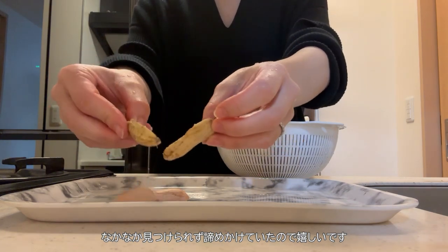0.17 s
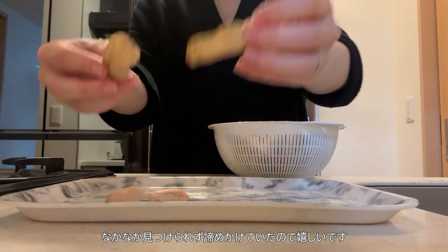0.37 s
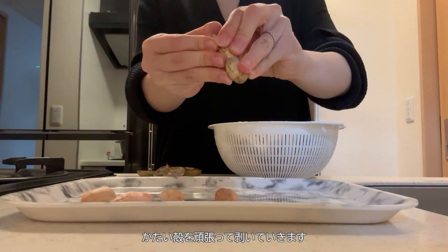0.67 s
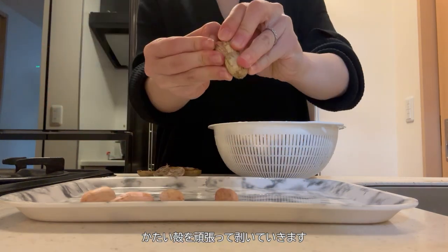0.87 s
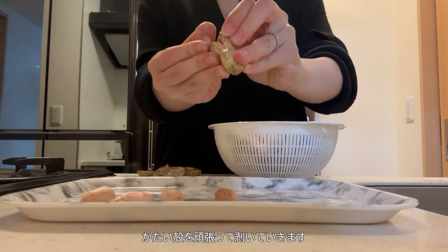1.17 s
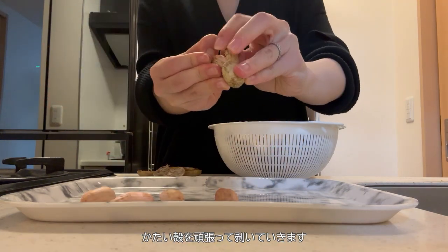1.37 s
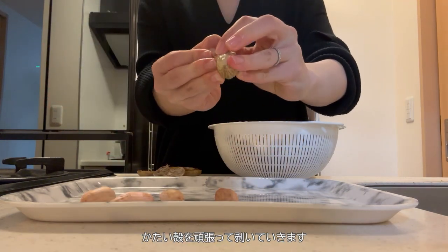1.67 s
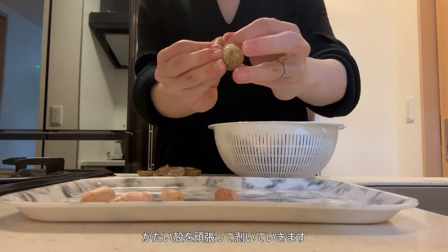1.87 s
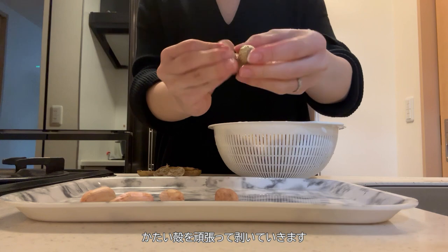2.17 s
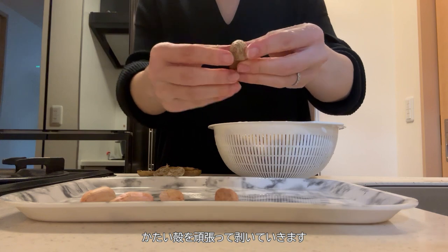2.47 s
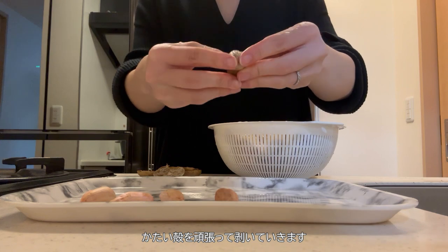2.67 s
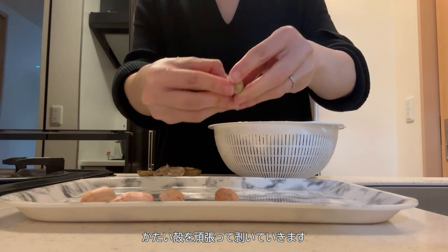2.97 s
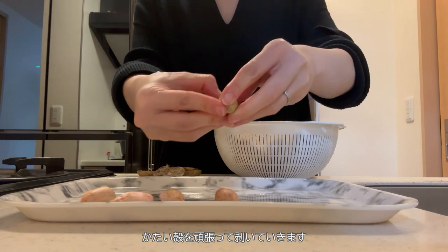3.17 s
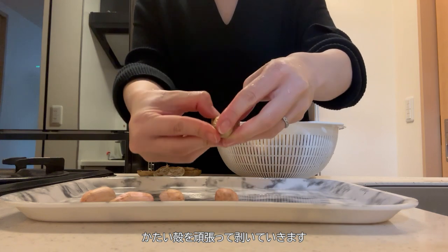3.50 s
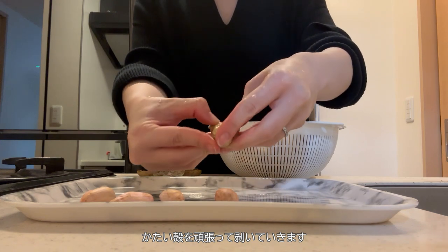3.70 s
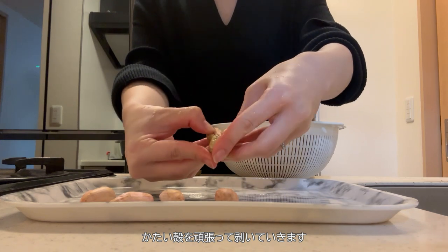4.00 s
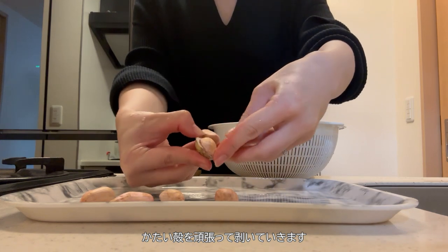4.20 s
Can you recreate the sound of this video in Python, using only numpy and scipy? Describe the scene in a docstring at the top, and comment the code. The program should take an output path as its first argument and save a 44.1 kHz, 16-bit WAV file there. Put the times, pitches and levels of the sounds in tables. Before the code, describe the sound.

Peanut kernels clatter onto a plastic tray, then hard shells crack and crinkle between fingers over a low kitchen appliance hum.

```python
"""Peanut kernels drop and bounce on a plastic tray, each impact exciting its damped bending modes.
Then shells snap and tick as they are broken by hand: fracture and crinkling strike the resonances
of the shell, and fingers rub the husk with a faint stick-slip hiss. The hard walls of a small
kitchen add reverberation, and appliances hum throughout."""
import sys
import numpy as np
from scipy import signal
from scipy.io import wavfile

SR = 44100
rng = np.random.default_rng(int(sys.argv[2]) if len(sys.argv) > 2 else 0)


def transcribe(signal):
    """Save signal, clipped to [-1, 1], as a 16-bit WAV file at the path in sys.argv[1]."""
    frames = np.atleast_2d(signal).T
    limited = np.clip(frames, -1, 1)
    pcm = np.round(limited * 32767).astype(np.int16)
    wavfile.write(sys.argv[1], SR, pcm)


N = 191482


def kernels_on_tray():
    """Impact excitation: each landing gives a contact tick, a broad knock and damped plate modes."""
    # landings: t/s, relative level/dB, hardness/(dB/octave), tick/dB, thump/dB, left minus right/dB
    drops = [(0.018, -19.5, 4, -9.5, -1.5, 4), (0.0327, -16, 4, -3.5, -1, 0),
             (0.1381, -18, 2, -6.5, -3, 1.5), (0.175, -21, -1.5, -30, -3.8, 3.5),
             (0.334, -43, -5.5, -22.5, 7, 1), (0.3907, -25.5, -8.5, -29, -12, 3),
             (.439, -32.5, -11.5, -28, -3.5, -2.1)]
    # tray modes: f/Hz, relative level/dB, T60/s
    tray_modes = [(165, -4.5, 0.19), (198.9, 1.9, 0.13), (283.5, -0.5, 0.12), (472, 0.5, 0.04),
                  (563.6, 0.5, 0.077), (810, -12.5, 0.15), (914.6, -4.5, 0.037), (1100, -9, 0.085),
                  (1143, -6, 0.069), (1248, -11, 0.11), (1860, -20, 0.16)]
    # knock spectrum of the thin tray: f/Hz, relative level/dB
    knock_spectrum = [(60, -36), (120, -22), (200, 11), (550, 9), (1200, 2.2), (2000, -10), (3000, -19.5),
                      (5000, -34.5), (9000, -114), (16000, -85.5)]
    out, length = np.zeros((2, N)), SR // 3
    t = np.arange(length) / SR
    hz, mode_db, t60 = np.transpose(tray_modes)[..., None]
    phase = rng.uniform(-0.8, 1, hz.shape) * np.clip(hz / 700, 0, 1.4)  # high modes arrive out of step
    for start_s, db, hardness, tick_db, thump_db, pan_db in drops:
        def blow_db(f):
            """Force spectrum: hard blows favour the treble; heavy ones move the whole tray."""
            return hardness * np.log2(np.maximum(f, 500) / 500) + thump_db * (f < 350)
        swing = from_db(mode_db - 5.5 + blow_db(hz) + rng.normal(0, 3.2, hz.shape) - 60 * t / t60)
        swing *= 1 - np.exp(-t * hz / 0.6)  # low modes take longer to swing up
        modes = np.array([np.sum(swing * np.sin(2 * np.pi * hz * t + side * phase), axis=0)
                          for side in (1, -1)])
        knock = decaying_noise(lambda f: 0.18 * (f / 1000) ** -.3,
                               lambda f: at_hz(knock_spectrum, f) + blow_db(f),
                               rise_s=0.00038, count=length)
        contact = rng.standard_normal(length) + .5 * rng.standard_normal((2, length))
        contact *= t / .0008 * np.exp(-t / .0008)
        tick = 17.5 * resonance(resonance(contact, 1960, 1080), 1640, 970)
        tick += 0.043 * resonance(resonance(contact, 3000, 3000), 3000, 3000)
        impact = modes + from_db(21) * knock + from_db(tick_db) * tick
        at = round(start_s * SR)
        out[:, at:at + length] += from_db(db) * pan(pan_db)[:, None] * impact
    # a small tray radiates little bass
    return signal.sosfilt(signal.butter(2, 80, "high", fs=SR, output="sos"), out)


def shell_cracks():
    """Brittle fracture strikes the shell's resonances, deep breaks the low ones: left, right, walls."""
    # fractures: t/s, relative level/dB, depth/dB, length/ms, left minus right/dB, share to walls/dB
    snaps = [(0.7932, -18.5, 10, 1.22, 4.5, -5.5), (1.0456, -32, -15, 1.84, 0.5, -3.5),
             (1.516, -62, -18.5, 1.7, -1.5, -3), (3.3355, -43.5, 4.5, 1.5, 3, -2),
             (3.6386, -37, -1.5, 1.46, -1.5, -1.5), (3.745, -47, -4.5, 1.8, 1.5, -1.5),
             (3.9879, -52.5, -8.5, 1.55, 2.5, 1.5), (4.0589, -21, 17, 2.5, 5, -1.5)]
    # husk crinkling in the grip: t/s, relative level/dB, depth/dB, length/ms
    crinkles = [(.5756, -67, -4, 21), (0.6203, -61, -17, 9.7), (0.665, -74.5, -10.5, 14),
                (.7282, -64.5, -10.5, 6.8), (0.7512, -52, -8, 11), (0.9792, -56, -9, 11.8),
                (1.1502, -82, 7.5, 13.4), (1.566, -77.5, -10, 10.8), (1.665, -88.5, 12.5, 11.6),
                (1.752, -81, -0.5, 22), (1.868, -85.5, 7, 18), (2.1518, -91, 14.5, 23),
                (2.256, -74.5, -5, 14), (2.292, -96, 18.5, 19), (2.915, -85, -1.5, 18),
                (3.074, -87.5, 5.5, 5.6), (3.1368, -84.5, 3.5, 5), (3.3, -69.5, -1.5, 17.3)]
    # resonances of body, hollow, wall, edge and splinter, a list for each part:
    # f/Hz, bandwidth/Hz, relative level/dB, left minus right/dB, left lag/ms
    shell_modes = [
        [(520, 270, 2.5, -5.5, 0.109), (1010, 180, 8.5, -8, 0.25)],
        [(1490, 520, 6.5, 7, 0.2), (2690, 500, 2.5, -4, 0.033)],
        [(3780, 570, -2, -2, 0.18), (4480, 360, 2, 9.5, 0.12), (5140, 920, -2.5, 1, 0.1)],
        [(7030, 970, -1.5, 2, 0.052), (9100, 1400, -8, -5, 0.04)],
        [(10874, 1000, -12, 3.5, 0.0066), (12300, 1200, -10, -4, 0.0012), (15100, 760, -10.5, -5.5, 0.00082)],
    ]
    # drive of each part: snap level/dB, crinkle level/dB, share of snap depth, share of crinkle depth
    part_drive = [(-34, -24.5, 1.74, .9), (-12, -8, 0.46, 1.2), (-3, -5.5, 0.36, .8), (-6, -5.5, .15, 0.52),
                  (1, -1, 0, 0.4)]
    snap_s, snap_db, snap_depth, snap_ms, snap_pan, walls_db = np.transpose(snaps)[..., None]
    crinkle_s, crinkle_db, crinkle_depth, crinkle_ms = np.transpose(crinkles)[..., None]
    out, polarity = 0, 1
    for modes, (in_snap_db, in_crinkle_db, snap_share, crinkle_share) in zip(shell_modes, part_drive):
        snap_drive_db = snap_db + in_snap_db + snap_share * snap_depth
        crinkle_drive_db = crinkle_db + in_crinkle_db + crinkle_share * crinkle_depth
        for hz, width, mode_db, left_db, lag_ms in modes:
            snap = fracture_impulses(snap_s, snap_drive_db, snap_ms, snap_pan + left_db, lag_ms,
                                     walls_db, slip_db=-10.5, slips=12)
            crinkle = fracture_impulses(crinkle_s, crinkle_drive_db, crinkle_ms, 5.5 + left_db, lag_ms,
                                        walls_db=0, slip_db=3, slips=40)
            out = out + polarity * from_db(mode_db + 29) * resonance(snap + crinkle, hz, width)
            polarity = -polarity
    return out


def fracture_impulses(start_s, db, length_ms, pan_db, lag_ms, walls_db, slip_db, slips):
    """Stress is released in steps, a first break and then fading slips: left, right, walls."""
    when, size = rng.random((2, len(start_s), slips + 1))
    offset_ms = np.c_[.8 * when[:, :1], length_ms * when[:, 1:]]
    slip_sizes = from_db(slip_db) * (2 * size[:, 1:] - 1) * (1.2 - when[:, 1:])
    sizes = np.c_[np.ones(start_s.shape), slip_sizes] * from_db(db)
    drawn_out = length_ms > 4  # from a shorter snap the walls return one blow
    walls = from_db(walls_db) * (drawn_out | (np.arange(slips + 1) == 0))
    left, right = pan(pan_db)
    delays_ms = (offset_ms + lag_ms, offset_ms, offset_ms * drawn_out)
    impulses = np.zeros((3, N))
    for path, gain, delay_ms in zip(impulses, (left, right, walls), delays_ms):
        np.add.at(path, np.round((start_s + delay_ms / 1000) * SR).astype(int), gain * sizes)
    return impulses


def husk_rub():
    """Stick-slip friction: fibres let go at random under the fingers; strokes swell, hold and fade."""
    # finger strokes: start t/s, hold/s, level/dB
    strokes = [(.59, 0.027, -83), (.75, 0.044, -74), (1.857, 0.033, -95), (3.055, 0.28, -84.5)]
    # resonances of the rubbed husk: f/Hz, bandwidth/Hz, relative level/dB
    husk_modes = [(13300, 2200, -0.5), (4594, 970, -3.5), (7000, 1500, -15)]
    rise_db_per_s, fall_db_per_s, slips_per_s = 493, 160.5, 1000
    grip_db = -100  # the faint rub of merely holding
    t = np.arange(N) / SR
    start, hold, db = np.transpose(strokes)[..., None]
    stroke_db = db - rise_db_per_s * np.maximum(start - t, 0)
    stroke_db -= fall_db_per_s * np.maximum(t - start - hold, 0)
    released = rng.random(N) < slips_per_s / SR
    slips = released * from_db(4 * np.minimum(rng.exponential(1, N), 4)) * rng.choice([-1, 1], N)
    hiss = sum(from_db(mode_db) * resonance(slips, hz, width) for hz, width, mode_db in husk_modes)
    return (from_db(grip_db) + from_db(stroke_db.max(axis=0))) * rms_one(hiss) * pan(2.5)[:, None]


def kitchen_reverberation(sound):
    """Reflections from hard walls merge into a diffuse field with an exponential decay."""
    # reverberation time: f/Hz, T60/s
    decay = [(100, 0.84), (500, 0.42), (1500, 0.24), (4000, 0.3), (8000, 0.28), (15000, 0.12)]
    # spectrum of the reflections: f/Hz, relative level/dB
    colour = [(100, 8.5), (400, -6), (1200, -2.5), (3000, 3), (4400, 0.5), (6000, 2), (9000, 3),
              (15000, -2)]
    response = decaying_noise(lambda f: at_hz(decay, f), lambda f: at_hz(colour, f),
                              rise_s=0.00054, count=SR // 2)
    return signal.fftconvolve(sound, response, axes=-1)[..., :N]


def appliance_hum():
    """Broadband noise lies under narrowband drones, whose close frequencies beat and so waver."""
    # broad hum: f/Hz, relative spectral density level/dB
    spectrum = [(15, -41), (25, -15.5), (87, -6.5), (167, -10), (445, -12), (510, -18.5), (651, -12.5),
                (1120, -23), (1600, -28), (2600, -36.5), (3510, -52), (4360, -43.5), (7710, -56.5),
                (14400, -64.5), (16500, -75)]
    # stereo coherence of the hum: f/Hz, left-right correlation
    coherence = [(60, 1), (130, 0.75), (290, 0.84), (640, -0.31), (1410, -0.21), (3100, 0.34),
                 (6820, -0.36), (15000, 0.48)]
    # appliance drones: f/Hz, bandwidth/Hz, level/dB
    drones = [(71.8, 14, -60.5), (108.55, 19, -61), (283, 20, -70.5), (659, 63, -70)]
    hum_db, settle = -56, SR // 2
    broad = sum(from_db(at_hz(spectrum, hz)) * band[:, settle:]
                for hz, band in noise_bands(coherence, N + settle))
    out = from_db(hum_db) * rms_one(broad)
    for hz, width, db in drones:
        white = rng.standard_normal((2, N + settle))
        mid, side = resonance(resonance(white, hz, width), hz, width)[:, settle:]
        out += from_db(db) * rms_one(mid + 0.28 * side * [[1], [-1]])
    return out


def decaying_noise(t60_of, db_of, rise_s, count):
    """Dense echoes act as noise that builds up, then decays at its own rate in each band."""
    # stereo coherence of the echoes: f/Hz, left-right correlation
    coherence = [(60, 1), (130, -0.71), (290, 0.7), (640, -0.014), (1410, -0.48), (3100, 0.23),
                 (6820, -0.61), (15000, 0.9)]
    # stereo balance of the echoes: f/Hz, left minus right/dB
    balance = [(60, 12), (130, 2.5), (290, -5), (640, -1.5), (1410, -1), (3100, 2.5), (6820, 3.5),
               (15000, -3)]
    t, out = np.arange(count) / SR, 0
    for hz, band in noise_bands(coherence, count):
        envelope = from_db(-60 * t / max(t60_of(hz), .01)) * (1 - np.exp(-(t / rise_s) ** 2))
        envelope /= np.sqrt(np.sum(envelope ** 2))
        out = out + band * pan(at_hz(balance, hz))[:, None] * from_db(db_of(hz)) * envelope
    return out


def noise_bands(coherence, count):
    """Third-octave noise bands; the ratio of mid to side sets the left-right correlation."""
    edges_hz = 25 * 2 ** np.arange(0, 9.7, 1 / 3)
    white = rng.standard_normal((3, 2, count))  # neighbouring bands draw on independent noise
    for k, (low, high) in enumerate(zip(edges_hz, edges_hz[1:])):
        bandpass = signal.butter(2, [low, high], "band", fs=SR, output="sos")
        mid, side = signal.sosfilt(bandpass, white[k % 3])
        hz = np.sqrt(low * high)
        correlation = np.clip(at_hz(coherence, hz), -1, 1)
        yield hz, np.sqrt(1 + correlation) * mid + np.sqrt(1 - correlation) * side * [[1], [-1]]


def resonance(x, hz, width_hz):
    """A driven damped oscillator with unit gain at its peak."""
    r = np.exp(-np.pi * width_hz / SR)
    feedback = [1, -2 * r * np.cos(2 * np.pi * hz / SR), r * r]
    return signal.lfilter(np.array([1, 0, -1]) * (1 - r * r) / 2, feedback, x + 1e-18)


def from_db(db):
    """Amplitude ratio for a level."""
    return 10 ** (np.asarray(db) / 20)


def rms_one(x):
    """Normalisation to unit mean power."""
    return x / np.sqrt(np.mean(x ** 2) + 1e-20)


def at_hz(points, hz):
    """Interpolation along a logarithmic frequency axis."""
    frequencies, values = np.transpose(points)
    return np.interp(np.log(hz), np.log(frequencies), values)


def pan(db):
    """Left and right gains for a left-minus-right level difference."""
    return from_db(np.multiply.outer([.5, -.5], db))


def scene():
    """Superposition of direct sound, an early reflection, reverberation and hum."""
    cracks, rub, tray = shell_cracks(), husk_rub(), kernels_on_tray()
    shell, shell_to_walls = cracks[:2], cracks[2]
    echo_s, echo_db = 0.0029, -12.5  # the tray under the hands reflects each break
    tray_echo = from_db(echo_db) * np.roll(shell, round(echo_s * SR), axis=1)
    # the tray radiates its treble upward, not to the walls
    dull_tray = signal.sosfilt(signal.butter(1, 4000, fs=SR, output="sos"), tray)
    to_walls = from_db(-2.5) * shell_to_walls + from_db(-4) * rub[0] + from_db(-8) * dull_tray
    return tray + shell + tray_echo + rub + kitchen_reverberation(to_walls) + appliance_hum()


def record(dry):
    """Soft saturation rounds the loudest peaks; a steep low-pass removes the highest treble."""
    ceiling, stopband_hz = .95, 16960
    rounded = ceiling * np.tanh(dry / ceiling)
    return signal.sosfilt(signal.cheby2(12, 70, stopband_hz, fs=SR, output="sos"), rounded)


dry = scene()
out = record(dry)
transcribe(out)
```